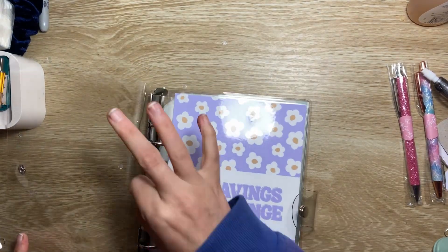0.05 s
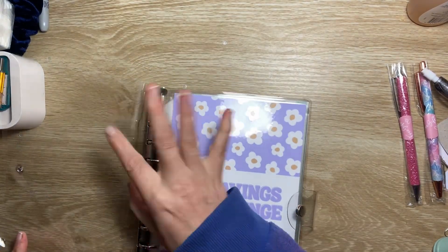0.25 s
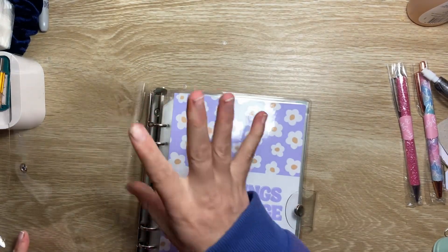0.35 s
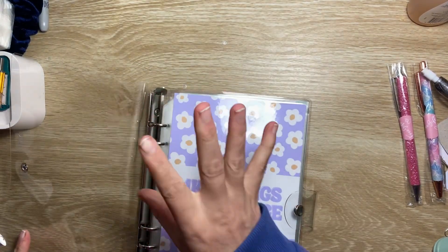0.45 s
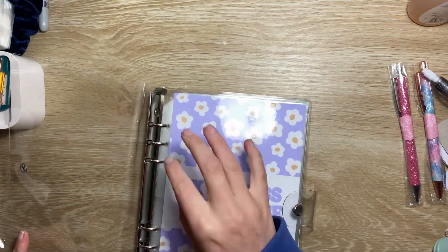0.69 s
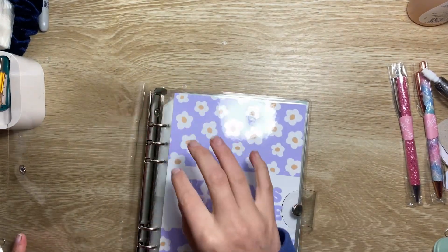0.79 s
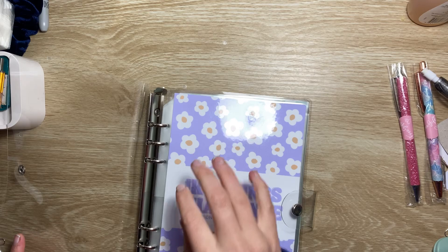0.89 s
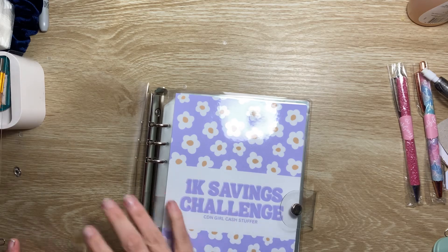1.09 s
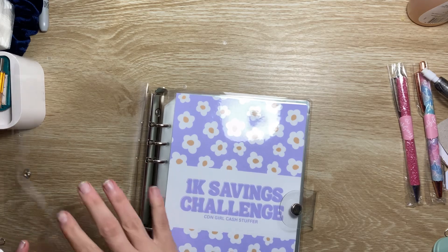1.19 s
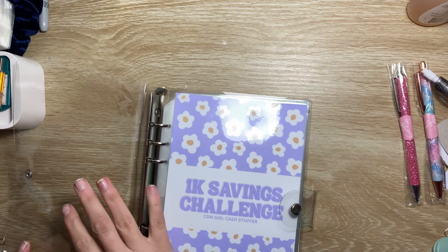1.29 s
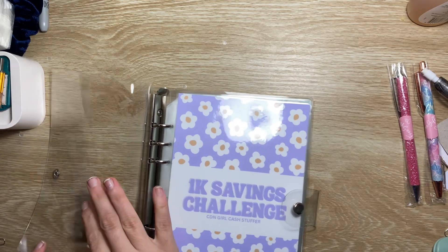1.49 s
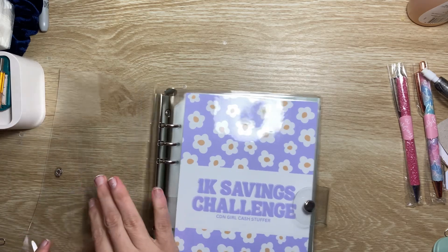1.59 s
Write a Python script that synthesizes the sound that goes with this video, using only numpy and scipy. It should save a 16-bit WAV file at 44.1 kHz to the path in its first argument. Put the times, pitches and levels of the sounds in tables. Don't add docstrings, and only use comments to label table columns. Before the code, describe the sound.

A stiff plastic binder cover slaps down on a wooden desk with one sharp hollow clack, ticks as it settles, then after a pause a hand slides and taps softly; quiet small room, close phone microphone.

```python
import sys
import numpy as np
from scipy import signal
from scipy.fft import rfft, irfft
from scipy.io import wavfile
from scipy.ndimage import uniform_filter1d

SR = 44100
rng = np.random.default_rng(int(sys.argv[2]) if len(sys.argv) > 2 else 0)


def boost(x):
    u = np.asarray(x, float) / 20
    return 10 ** u


def put_to_file(sound):
    columns = np.atleast_2d(sound).T
    safe = np.clip(columns, -1, 1)
    whole_steps = np.round(safe * 32767)
    wavfile.write(sys.argv[1], SR, whole_steps.astype(np.int16))


N = 72765
BINS_HZ = np.fft.rfftfreq(N, 1 / SR)


def read(points, hz):
    f, value = np.transpose(points)
    return np.interp(np.log(hz + 1), np.log(f + 1), value)


def evened(x):
    return x / np.sqrt(np.mean(x ** 2) + 1e-20)


def add(mix, s, sound, pan_db):
    at = round(s * SR)
    part = mix[:, at:at + np.shape(sound)[-1]]
    sides = boost(np.array([[pan_db / 2], [-pan_db / 2]]))
    part += sides * np.atleast_2d(sound)[:, :part.shape[1]]


def resonance(hz, f, width):
    return 1 / (1 + (2 * (hz - f) / width) ** 2)


def coloured(points, count, channels=1, peaks=()):
    z = rfft(rng.standard_normal((channels, count)))
    hz = np.fft.rfftfreq(count, 1 / SR)
    db = read(points, hz)
    for f, width, lift in peaks:
        db = db + lift * resonance(hz, f, width)
    return evened(irfft(z * boost(db), count))


def tilted(x, db, hz):
    low = signal.lfilter(*signal.butter(2, hz, fs=SR), x)
    return low + boost(db) * (x - low)


def struck(t60, rise, count=8192):
    t = np.arange(count) / SR
    shape = (1 - np.exp(-t / rise)) ** 2 * boost(-60 * t / t60)
    return t, shape / shape.max()


def mode(hz, t60, rise, sag=0, count=8192):
    t, shape = struck(t60, rise, count)
    return -shape * np.sin(2 * np.pi * hz * t / (1 + sag * t))


# [f/Hz, level/dB per Hz]
AIR_SPECTRUM = [(24, -48), (40, -11.5), (60, -7.5), (110, -17.5), (200, -22), (550, -33), (12000, -50),
                (13500, -72)]
# [f/Hz, correlation]
AIR_LIKENESS = [(40, .8), (290, 0.9), (640, .05), (15000, 0.11)]
# [f/Hz, width/Hz, level/dB]
HUM = [(97, 20, -78.5)]


def air():
    a, b = rfft(rng.standard_normal((2, N)))
    same = np.clip(read(AIR_LIKENESS, BINS_HZ), -1, 1)
    z = np.array([a, same * a + np.sqrt(1 - same ** 2) * b])
    out = boost(-73) * evened(irfft(z * boost(read(AIR_SPECTRUM, BINS_HZ)), N))
    for f, width, db in HUM:
        out = out + boost(db) * evened(irfft(z * resonance(BINS_HZ, f, width), N))
    return out


def drone():
    pitch_hz, wander_hz, left_lead_rad = 46.8, 2.2, 0.64
    wander = evened(uniform_filter1d(rng.standard_normal(N), size=6000))
    turns = np.cumsum(pitch_hz + wander_hz * wander) / SR
    return boost(-61.5) * np.sin(2 * np.pi * turns + np.array([[left_lead_rad], [0]]))


# [f/Hz, level/dB per Hz]
SHEET_SPECTRUM = [(600, -18.5), (1500, -4), (4200, -4), (7500, -8.5), (9800, -2), (12500, -4),
                  (14000, -17.5), (16000, -50.5)]
# [f/Hz, width/Hz, lift/dB]
SHEET_PEAKS = [(2520, 400, 4), (3750, 280, 7), (4500, 710, 7), (6200, 400, 8.5), (10200, 900, 6),
               (11900, 590, 5)]


def sheet_noise(count):
    return coloured(SHEET_SPECTRUM, count, peaks=SHEET_PEAKS)


# [t/s, level/dB]
RUSTLE = [
    (.3, -71),
    (.4, -96),
    (.45, -68),
    (.49, -82),
    (.55, -83),
    (.61, -79.5),
    (.64, -98),
    (.76, -91),
    (.8, -100),
]


def rustle():
    t = np.arange(N) / SR
    return sheet_noise(N) * boost(np.interp(t, *np.transpose(RUSTLE), left=-120, right=-120))


# [t/s, pressure level/dB, dryness/dB of treble]
RUB = [(1.03, -100, -2), (1.06, -85, 8), (1.1, -102, 15), (1.16, -76.5, 4.5), (1.2, -83.5, 5),
       (1.23, -79.5, -2), (1.245, -64, -9), (1.289, -82.5, -6.5), (1.35, -75, -10), (1.419, -77.5, -14),
       (1.458, -66.5, 3.5), (1.499, -64, -2.5), (1.54, -66, 2.5), (1.601, -67, -2.5), (1.65, -66, -1.5)]
# [f/Hz, level/dB per Hz]
RUB_SPECTRUM = [(150, -5), (800, -6), (4300, -14), (5600, -23), (8200, -27), (9500, -17.5), (12500, -20),
                (15500, -55)]
# [f/Hz, width/Hz, lift/dB]
SKIN_PEAKS = [(829, 140, 6), (1400, 87, 6), (2010, 120, 3), (2940, 150, 1), (3360, 130, 4.5),
              (3960, 130, 5.5), (4400, 250, 5)]


def hand():
    bass_per_db = 0.5
    t = np.arange(N) / SR
    s, db, dry_db = np.transpose(RUB)
    grain = boost(1.5 * evened(uniform_filter1d(rng.standard_normal(N), size=150)))
    noise = coloured(RUB_SPECTRUM, N, channels=3, peaks=SKIN_PEAKS)
    noise = noise[0] + 0.4 * noise[1:]
    pressure_db = np.interp(t, s, db, left=-120)
    noise = noise * boost(bass_per_db * (pressure_db + 67.5))
    noise = tilted(noise, -bass_per_db * (pressure_db + 70.0), 1500)
    rub = tilted(noise, np.interp(t, s, dry_db), 7000) * boost(pressure_db + 3.5)
    return grain * (rub * boost(np.array([[-2.5], [2.5]])) + rustle())


SQUEAK_S = [1.28, 1.333, 1.358, 1.28, 1.5]
# [length/s, f/Hz, level/dB]
SQUEAKS = [
    (0.12, 400, -73.5),
    (.022, 1200, -73),
    (0.033, 1740, -69),
    (.06, 242.4, -66),
    (0.097, 1200, -69),
]


def squeaks():
    out = np.zeros((2, N))
    for s, (length, hz, db) in zip(SQUEAK_S, SQUEAKS):
        t = np.arange(0, length, 1 / SR)
        wobble = evened(uniform_filter1d(rng.standard_normal(8192), size=300))[:len(t)]
        tone = np.sin(2 * np.pi * np.cumsum(hz * (1 + 0.039 * wobble)) / SR)
        add(out, s, boost(db) * np.sin(np.pi * t / length) * tone, -2.5)
    return out


# [t/s, level/dB, f/Hz, t60/s]
THUDS = [(0, -68, 325, 0.025), (1.235, -49.5, 350, 0.03), (1.25, -50.5, 48, 0.15), (1.27, -62, 154.5, 0.18),
         (1.399, -42, 390, 0.01), (1.412, -46, 121.4, 0.1), (1.442, -38, 268, 0.012),
         (1.454, -48.5, 108, 0.076), (1.5, -57.5, 166, 0.08), (1.531, -51, 60, 0.076),
         (1.625, -58, 118, 0.095)]


def thuds():
    out = np.zeros((2, N))
    for s, db, hz, t60 in THUDS:
        add(out, s, boost(db) * mode(hz, t60, 0.34 / hz, count=16384), -2)
    return out


# [t/s, peak level/dB, f/Hz, edge f/Hz, puff brightness/dB]
TAPS = [(1.2322, -47, 831, 3674, -4.5), (1.324, -71.5, 1200, 2517, -2), (1.336, -69, 1200, 3000, -27),
        (1.375, -68, 1750, 2500, -3), (1.394, -50, 959, 1680, -2), (1.406, -59.5, 1735, 4000, -3.5),
        (1.44, -39.5, 637, 3545, -2.5), (1.448, -49.5, 1363, 2200, -28.5), (1.585, -61.5, 760, 2010, -20),
        (1.621, -52, 1310, 2450, -9), (1.628, -38.5, 762, 3120, -4), (1.64, -59, 1200, 2400, -21)]
# [f/Hz, level/dB per Hz]
PUFF_SPECTRUM = [(250, -6.5), (850, -1), (4300, -4.5), (5500, -15.5), (8000, -24.5), (11500, -21.5),
                 (13500, -35.5), (15500, -60)]


def taps():
    out = np.zeros((2, N))
    for s, db, hz, edge_hz, bright_db in TAPS:
        puff = coloured(PUFF_SPECTRUM, 8192) * struck(0.03, 0.0007)[1]
        hollow = mode(hz, 0.021, 0.00049)
        edge = boost(-2.5) * mode(edge_hz, 0.01, 0.0019)
        wood = boost(-20.5) * mode(2037, 0.095, 0.0014)
        add(out, s, boost(db) * (hollow + edge + wood + boost(bright_db) * puff), -2.5)
    return out


# [t/s, f/Hz, peak level/dB, t60/s]
RINGS = [(.2235, 720, -51, 0.017), (.27, 652, -39, 0.072), (.33, 821, -58, 0.11), (1.2335, 568, -52, .03),
         (1.25, 622, -62, .06), (.25, 497.4, -36, 0.13), (1.246, 217, -56.5, 0.054),
         (1.6285, 2830, -47, .012), (0.2428, 1133, -17, 0.0089), (.2475, 787, -29.5, 0.007),
         (.254, 1140, -24, 0.0087), (0.2502, 4500, -41.5, .008), (.264, 1400, -33, 0.0063),
         (.281, 913, -39, 0.016), (0.331, 1228, -60.5, 0.18), (1.2337, 2700, -54, 0.027),
         (1.2322, 4146, -53, .015), (1.233, 3230, -58, 0.018), (1.233, 1322, -58, 0.067),
         (1.296, 1310, -69, 0.012), (1.337, 3400, -70, .015), (1.348, 4260, -72, .015),
         (1.391, 1700, -58.5, 0.011), (1.396, 2940, -54, .014), (1.396, 3500, -59, .016),
         (1.396, 4480, -64, .01), (1.3975, 845, -39, 0.019), (1.44, 2066, -49, .06),
         (1.44, 4800, -51, 0.0082), (1.439, 2730, -58, 0.012), (1.6285, 2030, -48.5, .05),
         (1.6288, 2437, -43, 0.013), (1.6283, 1200, -54, 0.017), (1.6278, 4220, -57, 0.01)]


def rings():
    out = np.zeros((2, N))
    for s, hz, db, t60 in RINGS:
        add(out, s, boost(db) * mode(hz, t60, 0.00066), -2.5)
    return out


# [t/s, peak level/dB, t60/s, brightness/dB]
TICKS = [(0.2194, -39.5, 0.015, 8.5), (0.247, -37, 0.011, 12), (0.2706, -34.5, 0.015, 1.5),
         (0.291, -43.5, 0.023, 16), (0.3116, -44, 0.036, -5.5), (0.3658, -62, 0.019, -9),
         (0.3725, -56, 0.02, 1), (0.3899, -62, 0.043, -17.5), (0.4231, -49.5, 0.021, 2),
         (0.4385, -43, 0.034, 1), (0.4978, -50, 0.02, -2), (0.5203, -53, 0.02, 0.5),
         (0.5345, -56, 0.02, 12), (0.5475, -56.5, 0.027, 7), (0.5761, -56, 0.021, 6.5),
         (0.5966, -62, 0.02, -1), (1.0537, -64, 0.02, -8.5)]


def ticks():
    out = np.zeros((2, N))
    for s, db, t60, bright_db in TICKS:
        snap = tilted(sheet_noise(8192), bright_db, 7000) * struck(t60, 0.00035)[1]
        add(out, s, boost(db - 1.5) * snap / abs(snap).max(), -4)
    return out


# [f/Hz, level/dB per Hz]
CRACK_SPECTRUM = [(1500, 4), (4500, 1), (5800, -5.5), (7400, -15.5), (9400, -9), (12400, -9.5),
                  (15600, -11.5), (16100, -50.5)]


def crack():
    return boost(-22.5) * coloured(CRACK_SPECTRUM, 8192) * struck(0.012, 0.00067)[1]


# [f/Hz, level/dB per Hz]
SHUDDER_SPECTRUM = [(120, -6), (400, -0.5), (950, -1.5), (2100, -19.5), (4600, -19.5), (7000, -28.5),
                    (12000, -39), (15500, -58.5)]


def shudder():
    noise = coloured(SHUDDER_SPECTRUM, 16384, channels=3) * struck(0.2, 0.0038, count=16384)[1]
    return boost(-33.5) * (noise[0] + 0.6 * noise[1:])


# [f/Hz, level/dB, t60/s, rise/s, left-right level/dB]
CLACK_MODES = [(52.23, -40.5, 0.41, .03, -1.5), (77.6, -32.5, 0.23, 0.023, -5),
               (112, -29.5, 0.097, .008, 1.5), (186, -35, 0.13, 0.00802, 0), (344, -18, 0.043, .004, -3.5),
               (530, -11, 0.027, 0.0013, 1), (892, -28, .06, .004, -9), (1200, -25.5, .07, .004, -6.5),
               (1620, -33.5, .08, .003, -5.5), (2020, -23.5, 0.013, 0.00065, -7),
               (3000, -29, 0.0056, 0.00087, -6), (3566, -25, 0.013, 0.0015, -9.5),
               (4500, -22, 0.01, 0.00041, -7.5)]
REBOUND_S = [.0038, .0093, .0128, .021]
# [level/dB, left-right level/dB]
REBOUNDS = [
    (-19.5, 0),
    (-27.5, 6.5),
    (-21.5, -3.5),
    (-24.5, 3.5),
]


def clack():
    start_s, clack_db = 0.2335, -6
    hit, out = np.zeros((2, N)), np.zeros((2, N))
    slap = mode(1.213 * 900, 0.0042, 0.004, sag=52)
    add(hit, start_s, boost(clack_db + 1.2) * slap, -6.5)
    for hz, db, t60, rise, pan_db in CLACK_MODES:
        layer = hit if hz > 1800 else out
        add(layer, start_s, boost(clack_db + db) * mode(hz, t60, rise, count=16384), pan_db)
    for delay, (db, pan_db) in zip(REBOUND_S, REBOUNDS):
        add(out, delay, boost(db) * hit, pan_db)
    add(out, start_s - 0.0007, crack(), -1)
    add(out, start_s, shudder(), -1.5)
    return out + hit


# [f/Hz, t60/s]
ROOM_DECAY = [(60, 0.57), (250, 0.18), (1000, 0.165), (3000, 0.087), (6000, .15), (9000, .1), (14000, 0.15)]


def room(x):
    tail = np.zeros((2, 22000))
    at = np.arange(200, 21960, 20)
    at = at + rng.integers(0, 20, (2, len(at)))
    np.put_along_axis(tail, at, rng.choice([-1., 1.], at.shape), 1)
    hz, t, z = signal.stft(tail, SR, nperseg=256)
    decay = boost(-60 * t / read(ROOM_DECAY, hz)[:, None])
    tail = signal.istft(z * decay, SR, nperseg=256)[1]
    return signal.fftconvolve(x.mean(0)[None], tail / np.linalg.norm(tail[0]), axes=1)[:, :N]


# [f/Hz, left lead/rad, left-right level/dB]
PORTS = [(60, -.8, 1), (300, 1, 1), (760, -0.67, -3), (1830, -0.94, -3.5), (3420, -0.41, -8.5),
         (7000, -1.6, -2), (10950, -1.4, 2.5), (14200, 0, -2)]


def at_ports(x):
    left, right = x
    f, lead, db = np.transpose(PORTS)
    turn = np.exp(1j * read(np.c_[f, lead], BINS_HZ))
    left = irfft(rfft(left) * turn * boost(read(np.c_[f, db], BINS_HZ)), N)
    return np.array([left, right])


def scene():
    still = air() + drone()
    slide = hand()
    desk = squeaks() + thuds() + taps() + rings() + ticks() + clack()
    return at_ports(desk + slide) + boost(-15) * room(desk) + still


def low_pass(x):
    return signal.sosfilt(signal.butter(12, 16700, fs=SR, output="sos"), x)


def record(dry):
    low_cut = signal.butter(4, 21, "high", fs=SR, output="sos")
    mix = signal.sosfilt(low_cut, dry)
    mix = signal.oaconvolve(mix, signal.firwin(255, 16000, fs=SR)[None], "same")
    return low_pass(mix)


dry = scene()
out = record(dry)
put_to_file(out)
```